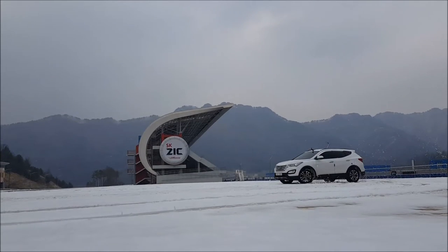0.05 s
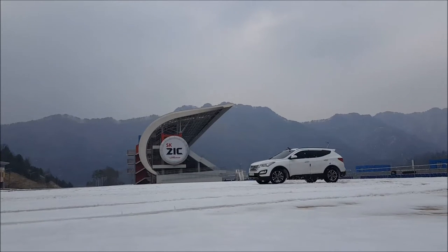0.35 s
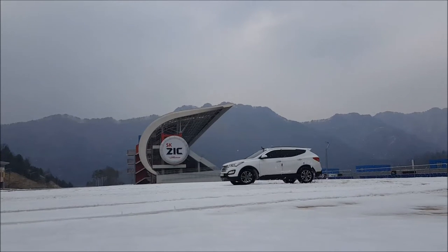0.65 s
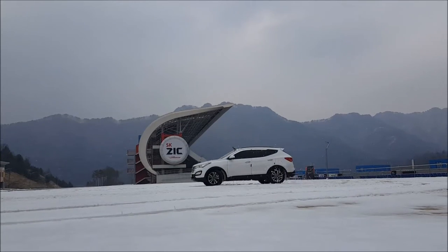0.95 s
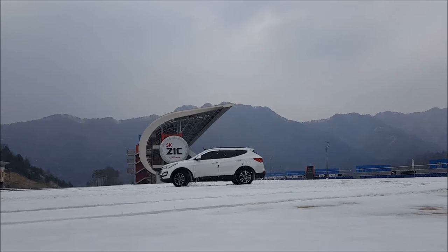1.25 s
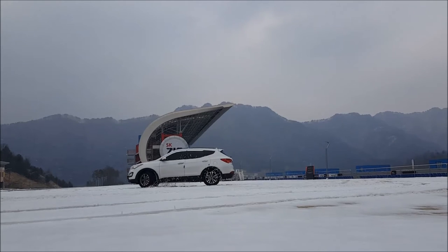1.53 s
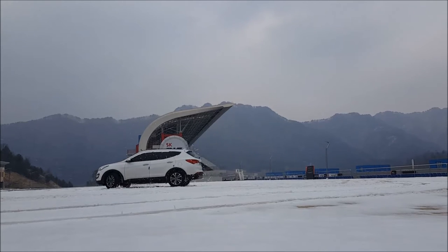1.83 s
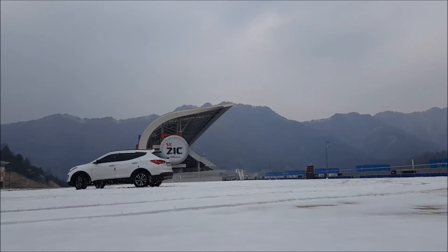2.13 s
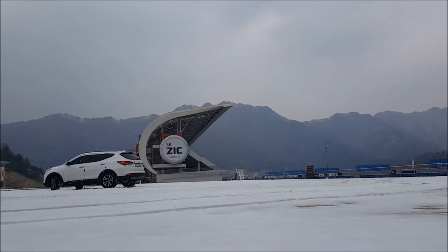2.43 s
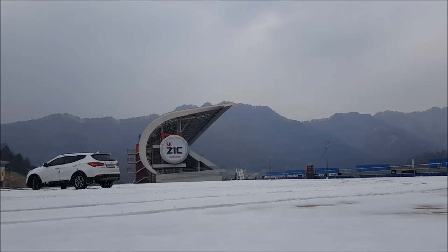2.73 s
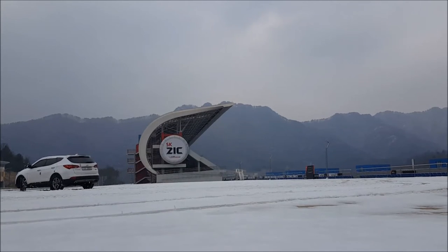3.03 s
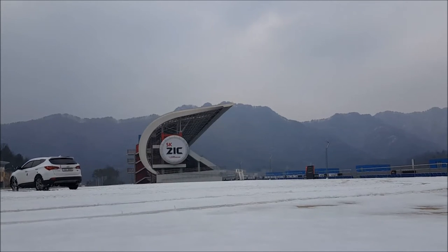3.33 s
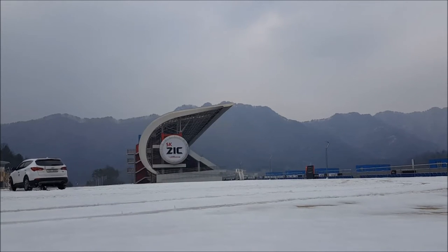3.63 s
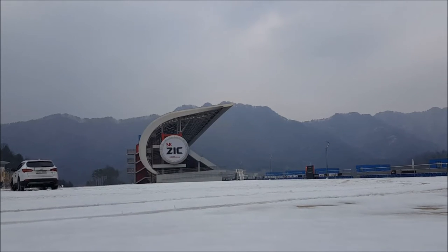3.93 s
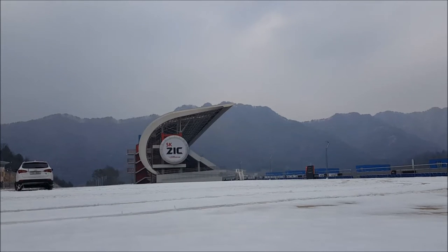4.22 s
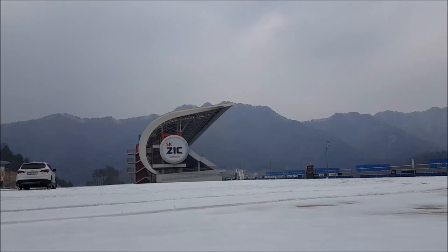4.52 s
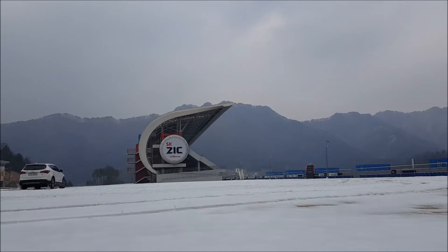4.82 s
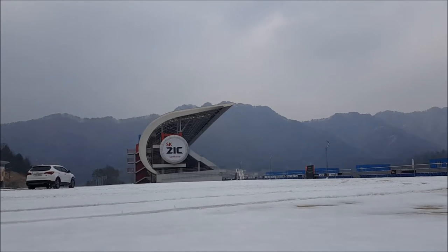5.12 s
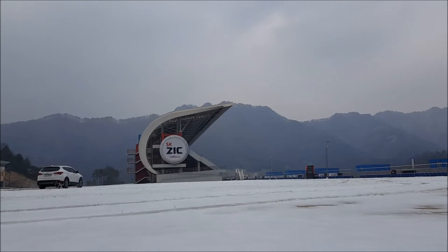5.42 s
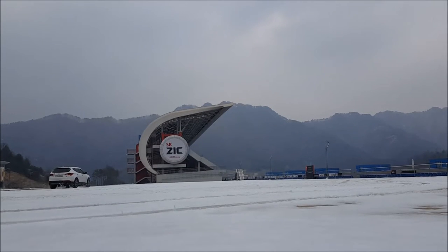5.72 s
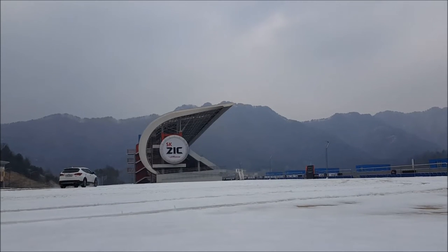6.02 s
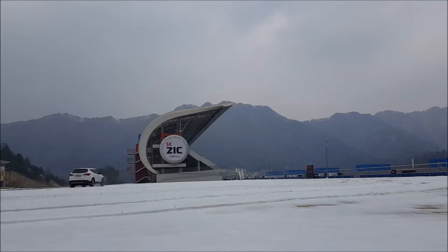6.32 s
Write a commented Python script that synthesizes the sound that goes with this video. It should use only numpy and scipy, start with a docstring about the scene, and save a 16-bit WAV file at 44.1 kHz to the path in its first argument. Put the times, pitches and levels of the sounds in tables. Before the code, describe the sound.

On an open field of packed snow, a car passes at a distance from right to left. Its tyres give a soft, steady roar with a faint wavering whine and light crunching hisses as the wheels slip. From about two seconds, gusts rumble and slap on the microphone, mostly on the left, and become the loudest sound. Near the end the wheels knock dully over ruts and the car sounds duller.

```python
"""An open field of packed snow, light air, a microphone with two closely spaced ports. Some 15 m off to
the right a car drives leftwards: its tyres roar, whine faintly and throw hissing snow, and now and then
a wheel slips, sings and scrapes. From two seconds on, with the car past centre, gusts buffet each port
separately. Around five seconds the wheels thump over ruts; then the car turns away, duller, over 30 m off."""
import sys
import numpy as np
from scipy import signal
from scipy.fft import rfft, irfft
from scipy.io import wavfile
from scipy.ndimage import uniform_filter1d, map_coordinates

SR = 44100
rng = np.random.default_rng(int(sys.argv[2]) if len(sys.argv) > 2 else 0)


def waveform_to_disk(signal):
    """Save audio, clipped to [-1, 1], as 16-bit WAV at the path in sys.argv[1]."""
    frames = np.transpose(np.atleast_2d(signal))
    scaled = np.clip(frames, -1, 1) * 32767
    samples = np.round(scaled).astype(np.int16)
    wavfile.write(sys.argv[1], SR, samples)


N = 289296
TIME, BINS = np.arange(N) / SR, np.fft.rfftfreq(N, 1 / SR)

# the car from the microphone: t/s, distance/m, lag of the left port/samples, dullness of the roar/0-1
CAR_PATH = [(0, 14.9, 5, 0.7), (.55, 19, 3, 0.5), (1.05, 14.7, 3.2, 0.44), (1.5, 21, -3.5, 0.44),
            (2.2, 17.4, -6, 0), (3.3, 23.1, -7.5, 0.42), (4, 26.8, -9, 0.53), (5.3, 28.3, -8.5, 0.38),
            (5.7, 36, -8, 0.97), (6.56, 32, -6.5, 0.93)]
# tyres rolling on packed snow: t/s, level/dB
ROAR_LEVEL = [(0, -55.5), (.58, -59), (1.08, -60), (1.45, -55.5), (1.96, -59.5), (2.2, -58), (4.7, -59),
              (6.14, -59.5), (6.56, -62)]
# their roar: f/Hz, level/dB
ROAR_SPECTRUM = [(60, -10), (150, 2), (340, -4), (450, 1), (570, 3), (650, 1), (740, 2), (850, 1.5),
                 (1000, -1.5), (1200, -6), (1450, -18.5), (2200, -31.5), (3200, -43.5)]
# a spinning wheel sings: t/s, length/s, f/Hz, glide from start to end/Hz, arch/Hz, level/dB
WHEEL_SPINS = [(0, 0.56, 852, -44, 5.5, -63), (0, .45, 897, -68, 3.5, -70),
               (0.622, 0.45, 731, -12, -3, -66.5), (1.2, 0.548, 806, 27.5, 26, -63),
               (2.25, 0.78, 822, -17, -1.5, -68), (3.15, 0.56, 801, -43.5, -4, -63),
               (3.55, 0.24, 722, 39, -7, -65), (3.72, 0.29, 837, 32, 3, -61.5),
               (4.08, 0.44, 791, -37.5, 12.5, -64), (4.47, 0.37, 805, 28, 5.5, -60.5),
               (4.589, 0.295, 746, 14.5, 3.5, -63.5), (4.721, 0.61, 720, 53.5, 5, -62),
               (4.85, 1, 802, 50, 14.5, -63.5), (5.52, 0.94, 758.5, 18, 41, -63)]
# its tone and the side notes of uneven tread blocks: multiple of the pitch, level/dB
TREAD_NOTES = [(.908, -7), (1, 0.5), (1.045, -7)]
# wheels slip and grip: t/s, length/s, tread pattern f/Hz, glide/Hz, arch/Hz, level/dB
WHEEL_SLIPS = [(-.3, .72, 57.02, -10, 3, -53.5), (1.122, 1.01, 50.04, -1.5, 8, -57.5),
               (3.001, 1.487, 55, 1, 0.5, -61)]
# resonances of the tyre body: f/Hz, level/dB
CARCASS_SPECTRUM = [(380, 15.5), (450, -3.5), (505, -17), (565, 8), (640, -28), (735, -8.5), (850, -12),
                    (1050, -10)]
# a wheel digs in, heard at NEAR_M: peak t/s, half width/s, crunch level/dB, scrape f/Hz, spray level/dB
SNOW_SKIDS = [(.05, 0.14, -80, 4200, -75.5), (.32, 0.082, -74, 3890, -77), (.62, 0.17, -72, 3720, -81),
              (1.23, .04, -79.5, 3700, -79), (1.46, 0.12, -70.5, 3580, -74), (1.74, .16, -69, 2924, -67.5),
              (1.96, 0.062, -75, 2810, -84), (2.19, .04, -82, 3730, -75), (2.39, .09, -78, 4260, -69.5),
              (2.82, .12, -74.5, 2800, -74), (3.92, 0.14, -71.5, 3920, -74), (4.2, 0.08, -73.5, 3600, -77),
              (4.92, .2, -73.5, 4000, -83), (5.4, 0.21, -76.5, 4050, -79)]
# crust breaking: f/Hz, level/dB
CRUNCH_SPECTRUM = [(1400, -24), (2300, -4.5), (3100, -0.5), (4100, 0), (5200, -2.5), (7000, -2), (8500, -3),
                   (10000, -15), (12000, -19.5), (16000, -33)]
# flung powder: f/Hz, level/dB
SPRAY_SPECTRUM = [(5000, -28.5), (7500, -11.5), (9000, -1.5), (10200, -5.5), (11800, -1), (15500, 0)]
# wheels striking ruts: t/s, level/dB, centre f/Hz, decay/s
RUT_THUMPS = [(4.67, -49, 766, 0.036), (5.279, -40.5, 850, 0.0095), (5.3, -58.5, 953, 0.094)]
# steady wind at the microphone: t/s, level/dB, left minus right/dB, depth of rumble (clipped to 0-1)
STEADY_WIND = [(0, -43.5, -4.5, -2), (1.15, -46.5, -1, 0.1), (1.8, -48.5, -1, 0.27), (2.02, -57.5, 1, 0.7),
               (2.1, -38, 10.5, 0.73), (2.95, -44.5, -0.5, 1), (3.3, -39, -3, 0.71), (4.3, -37, 3, 0.89),
               (5.2, -42, 5, 0.58), (6.56, -40.5, 3, 0.89)]
# gusts that swell and die away: peak t/s, half width/s, left level/dB, right level/dB
PORT_GUSTS = [(0.089, 0.042, -40, -47.5), (0.759, 0.017, -37.5, -34.5), (1.01, 0.054, -48.5, -44.5),
              (2.13, 0.052, -33, -35), (2.35, 0.15, -31, -39), (2.61, 0.02, -31.5, -45.5),
              (2.79, 0.016, -42.5, -36.5), (3.21, 0.11, -24.5, -45.5), (3.48, 0.091, -24.5, -34),
              (3.612, 0.052, -31.5, -32), (3.74, 0.014, -28.5, -42), (3.868, 0.025, -22.5, -41.5),
              (3.972, 0.018, -23, -51), (4.07, 0.023, -26, -42), (4.431, 0.059, -30.5, -40),
              (4.64, 0.075, -31.5, -31.5), (4.97, 0.039, -31.5, -20.5), (5.09, 0.043, -22, -35.5),
              (5.3, 0.025, -26, -41.5), (5.46, 0.18, -24.5, -38.5), (5.56, 0.037, -28.5, -21.5),
              (5.79, 0.065, -28, -23), (5.921, 0.018, -19.5, -35.5), (6.06, 0.086, -32.5, -30.5),
              (6.36, 0.018, -29.5, -30)]
# large eddies in light air: f/Hz, level/dB
BREEZE_SPECTRUM = [(20, -34), (35, -27.5), (55, -6.5), (100, 3.5), (150, 2.5), (220, -1), (300, -11.5),
                   (400, -19.5)]
# large eddies in strong wind: f/Hz, level/dB
GALE_SPECTRUM = [(15, -31.5), (35, -4.5), (65, 5), (120, 4), (200, -4), (300, -30), (450, -45)]
# small eddies: f/Hz, level/dB
FLUTTER_SPECTRUM = [(120, 4), (230, 6), (360, -2), (550, -16), (800, -22.5), (1300, -40), (2500, -60),
                    (6000, -70.5)]
# single eddies that slap a port: t/s, level/dB, left minus right/dB, length/s
EDDY_SLAPS = [(2.242, -22, 26, 0.0015), (2.314, -15.5, 29, 0.0013), (2.447, -23, 20, 0.0016),
              (2.565, -25.5, 23, 0.0018), (3.14, -18, 29, 0.0016), (3.446, -15.5, 33, 0.00096),
              (3.617, -15, 35, 0.0013), (3.888, -18.5, 29, 0.001), (3.974, -17, 38, 0.0011),
              (4.065, -22, 28, 0.0011), (4.581, -21, 25, 0.0011), (4.947, -23, -3.5, 0.0015),
              (4.975, -17.5, -24, 0.0011), (5.089, -15.5, 28, 0.0014), (5.577, -22, 5, 0.0016),
              (5.861, -19.5, -22.5, 0.0014), (5.920, -16.5, 39.5, 0.0014)]
# small sharp ticks: t/s, level/dB, centre f/Hz, decay/s
SHARP_TICKS = [(.419, -57.5, 2270, 0.0023), (1.235, -69, 11020, 0.0095), (2.754, -63, 14000, 0.0076),
               (3.017, -61, 3500, 0.0023), (3.2, -63, 3070, 0.0015), (4.2235, -61, 3280, 0.0026),
               (4.553, -63, 2115, 0.0049), (4.7237, -50.5, 15100, 0.0012), (6.041, -65, 2600, 0.0024),
               (6.064, -65, 4540, .002), (6.257, -64, 2600, .003), (6.468, -64, 2200, .002)]
# open air over the field: f/Hz, level/dB
AIR_SPECTRUM = [(30, -4), (150, 5), (600, -2), (1100, -11.5), (1600, -22.5), (2500, -27.5), (4500, -34),
                (10000, -37), (16000, -31)]
# wind over the ground: f/Hz, level/dB
RUSTLE_SPECTRUM = [(900, -1), (1500, -1.5), (2100, -3), (2800, -10), (4500, -15), (8000, -26.5)]

NEAR_M, SNOW_FALL_DB = 18.74, 9.5  # the snow loses this much with each doubling of distance from NEAR_M
PORT_HZ, PORT_WIDTH_HZ, PORT_DB = 8080, 600, 5  # cavity resonance of the microphone ports
BAND_LIMIT_HZ = 15800


def tyre_roar(level_db=2.0, uneven_db=1.44, muffle_hz=980):
    """The tread rolls on uneven packed snow; the roar dulls and brightens along the car's path."""
    (roar_db,), (_, _, dullness) = follow(ROAR_LEVEL), follow(CAR_PATH)
    roar = from_car(colour(noise()[0], ROAR_SPECTRUM), colour(noise(), ROAR_SPECTRUM), direct=1)
    muffled = irfft(rfft(roar) / (1 + (BINS / muffle_hz) ** 12), N)
    roar += dullness * (muffled - roar)
    return roar * amp(level_db + roar_db + uneven_db * wander(25)[0])


def wheel_whine(level_db=2.0, waver=0.0021, flicker_db=1.0):
    """Each spinning wheel gives a tone with side notes, whose pitch follows the wheel's speed."""
    out, unsteady = np.zeros(N), 1 + waver * wander(14)[0]
    for row in WHEEL_SPINS:
        during, hz, gain = slip(*row)
        turns = np.cumsum(hz * unsteady[during]) / SR
        tone = sum(amp(db) * np.cos(2 * np.pi * (k * turns + rng.random())) for k, db in TREAD_NOTES)
        out[during] += gain * evened(tone)
    return from_car(out * amp(level_db + flicker_db * wander(12)[0]))


def tread_whirr(level_db=-1.5, uneven_db=5.0, waver=.013):
    """Overtones of the tread pattern slide through the resonances of the tyres as the wheels slip."""
    tread_hz, gain = np.zeros((2, N))
    for row in WHEEL_SLIPS:
        during, tread_hz[during], gain[during] = slip(*row)
    turns = np.cumsum(tread_hz * (1 + waver * wander(25)[0])) / SR
    overtones = sum(amp(uneven_db * wander(4.4)[0]) * np.cos(2 * np.pi * (k * turns + rng.random()))
                    for k in range(8, 20))
    slipping = gain > 0
    whirr = colour(overtones * slipping, CARCASS_SPECTRUM) * np.sqrt(slipping.mean())  # rms 1 in slips
    return amp(level_db) * gain * from_car(whirr)


def slip(start, length, hz, glide_hz, arch_hz, db, fullness=0.61):
    """A wheel loses grip and finds it again: the samples it lasts, their arching pitch and their gain."""
    progress = (TIME - start) / length
    during = (progress > 0) & (progress < 1)
    progress = progress[during]
    arch = 4 * progress * (1 - progress)
    return during, hz + glide_hz * (progress - .5) + arch_hz * arch, amp(db) * arch ** fullness


def thrown_snow(scrape_db=-5, rolling_crunch_db=-75, rolling_spray_db=-76, direct=0.38, clumps_db=0.77):
    """The tread crushes crust and flings powder; skids add to both and scrape; distance weakens all."""
    crunch_power, spray_power, weighted_hz = np.zeros((3, N))
    for t, width, crunch_db, hz, spray_db in SNOW_SKIDS:
        bell = swell(t, width)
        crunch_power += amp(crunch_db) ** 2 * bell
        spray_power += amp(spray_db) ** 2 * bell
        weighted_hz += amp(crunch_db) ** 2 * bell * hz
    # where skids overlap, the scrape slides from one pitch to the next
    out = from_car(scrape(weighted_hz / crunch_power)) * np.sqrt(crunch_power) * amp(scrape_db)
    for spectrum, skid_power, rolling_db in ((CRUNCH_SPECTRUM, crunch_power, rolling_crunch_db),
                                             (SPRAY_SPECTRUM, spray_power, rolling_spray_db)):
        crystals = colour(grains(per_s=9000, spread_db=3.0)[0], spectrum)
        gain = np.sqrt(skid_power + amp(rolling_db) ** 2) * amp(clumps_db * wander(30)[0])
        out += from_car(crystals, colour(noise(), spectrum), direct) * gain
    distance_m = follow(CAR_PATH)[0]
    return out * amp(-SNOW_FALL_DB * np.log2(distance_m / NEAR_M))


def scrape(hz, width_hz=520):
    """Snow squeezed under a sliding tread: a fuzzy band of noise that follows hz."""
    band = irfft(rfft(noise()) * np.exp(-(BINS / width_hz) ** 2), N)
    phase = 2 * np.pi * np.cumsum(hz) / SR
    return evened(band[0] * np.cos(phase) + band[1] * np.sin(phase))


def rut_thumps():
    """The wheels knock dully over ruts."""
    return from_car(bursts(RUT_THUMPS, octaves=.42)[0])


def from_car(source, scatter=0, direct=1):
    """The direct share of the power reaches one port first; the scattered rest comes from all around."""
    _, lag, _ = follow(CAR_PATH)
    ports = np.array([map_coordinates(source, [np.arange(N) + side * lag / 2], order=3, mode="nearest")
                      for side in (-1, 1)])
    return np.sqrt(direct) * ports + np.sqrt(1 - direct) * scatter


def port_wind(rumble_db=-1, flutter_db=-14, strong_db=-35, lumpy_db=3.0, steadiness=0.77):
    """Large eddies rumble, deeper once the wind gets up; stronger gusts shed more small fluttering ones."""
    port_db = wind_level()
    depth = np.clip(follow(STEADY_WIND)[2], 0, 1)
    eddies = np.sqrt(1 - depth) * colour(noise(), BREEZE_SPECTRUM)
    eddies += np.sqrt(depth) * colour(noise(), GALE_SPECTRUM)
    # partly levelled over 50 ms, so that the gust sets the power of the eddies
    eddy_power = uniform_filter1d(eddies ** 2 + 1e-6, size=2200)
    eddies = evened(eddies / eddy_power ** (steadiness / 2))
    lumps = wander(56)
    rumble = evened(eddies * amp(lumpy_db * lumps))
    # small eddies come in ragged bunches, on the crests of the large ones
    flutter = evened(colour(noise(), FLUTTER_SPECTRUM) * amp(10 * np.tanh(lumps / 2)))
    growth_db = 2 * np.tanh((port_db - strong_db) / 10)
    return amp(port_db) * (amp(rumble_db) * rumble + amp(flutter_db + growth_db) * flutter)


def wind_level(restless_db=3.5, restless_hz=7):
    """Level in dB at each port: gusts ride on a restless steady wind."""
    steady_db, lean_db, _ = follow(STEADY_WIND)
    power = (amp(steady_db + restless_db * wander(restless_hz)) * panned(lean_db)) ** 2
    for t, width, left_db, right_db in PORT_GUSTS:
        power += amp([[left_db], [right_db]]) ** 2 * swell(t, width)
    return 10 * np.log10(power)


def eddy_slaps(level_db=-3, edge=0.55):
    """An eddy crossing a port: pressure builds, flips quickly to suction and relaxes."""
    out = np.zeros((2, N))
    for t, db, lean_db, length in EDDY_SLAPS:
        crossing = (TIME - t) / length
        slap = -np.tanh(crossing / edge) * np.exp(-np.hypot(crossing, edge))
        out += panned(lean_db)[:, None] * amp(db) * slap / abs(slap).max()
    return amp(level_db) * out


def ticks(level_db=-1):
    """Brief bright snaps, faint at both ports."""
    return amp(level_db) * bursts(SHARP_TICKS, octaves=1.27)


def open_field(air_db=-64, rustle_db=-74, patchy_db=1.77, breeze_db=-41, growth=0.3):
    """Faint even wash of the open air, and a rustle over the ground that grows with the steady wind."""
    sweep_db = growth * (follow(STEADY_WIND)[0] - breeze_db)
    rustle = colour(grains(per_s=5000, spread_db=1.5), RUSTLE_SPECTRUM)
    rustle *= amp(rustle_db + sweep_db + patchy_db * wander(25))
    return amp(air_db) * colour(noise(), AIR_SPECTRUM) + rustle


def grains(per_s, spread_db):
    """Breaking snow crystals: many tiny clicks, a few of them larger."""
    size = amp(spread_db * np.minimum(rng.exponential(1, (2, N)), 5))
    return evened(noise() * size * (rng.random((2, N)) < per_s / SR))


def bursts(rows, octaves):
    """Each blow is a puff of noise that dies away, ringing in one band."""
    out, size = np.zeros((2, N)), 16384
    age, bins = TIME[:size] - TIME[size // 20], np.fft.rfftfreq(size, 1 / SR)
    for t, db, hz, decay in rows:
        puff = rng.standard_normal((2, size)) * (age > 0) * np.exp(-abs(age) / decay)
        band = evened(np.exp(-(np.log2((bins + 1) / hz) / octaves) ** 2))
        start = round((t + age[0]) * SR)
        part = out[:, start:start + size]
        part += amp(db) * irfft(rfft(puff) * band)[:, :part.shape[1]]
    return out


def swell(t, width):
    """Power of a bell that peaks at t and dies away on both sides."""
    return np.exp(-np.minimum(((TIME - t) / width) ** 2, 20))


def colour(x, spectrum):
    """Gives x a spectrum that falls 39 dB an octave beyond its ends; rms 1."""
    hz, db = np.transpose(spectrum)
    octave, known = np.log2(BINS + 1), np.log2(hz + 1)
    beyond = abs(octave - np.clip(octave, known[0], known[-1]))
    return evened(irfft(rfft(x) * amp(np.interp(octave, known, db) - 39 * beyond), N))


def wander(hz):
    """Two slow random curves of rms 1, moving at rates up to about hz."""
    spectrum = rng.standard_normal((2, 1024, 2)) @ [1, 1j]
    return evened(irfft(spectrum * np.exp(-(BINS[:1024] / hz) ** 2), N))


def noise():
    """Unrelated white noise for the two ports."""
    return rng.standard_normal((2, N))


def follow(rows):
    """The columns of a curve table at every sample."""
    t, *columns = np.transpose(rows)
    return [np.interp(TIME, t, column) for column in columns]


def panned(lean_db):
    """Left and right gains of constant power."""
    pair = np.array([amp(lean_db / 2), amp(-lean_db / 2)])
    return pair / np.sqrt(np.mean(pair ** 2, 0))


def amp(db):
    """Decibels to gain."""
    return 10 ** (np.asarray(db) / 20)


def evened(x):
    """Scales to rms 1."""
    return x / np.sqrt(np.mean(x ** 2) + 1e-20)


def scene():
    """The distant car, the field all around and the wind right on the microphone."""
    car = tyre_roar() + wheel_whine() + tread_whirr() + thrown_snow() + rut_thumps()
    return car + ticks() + open_field() + port_wind() + eddy_slaps()


def record(dry):
    """The microphone: its port cavities ring in the treble, and a steep low-pass ends the band."""
    cavity = amp(PORT_DB * np.exp(-((BINS - PORT_HZ) / PORT_WIDTH_HZ) ** 2))
    soft_ends = signal.windows.tukey(N, .002)
    heard = irfft(rfft(dry * soft_ends) * cavity, N)
    low_pass = signal.firwin(511, BAND_LIMIT_HZ, window=("kaiser", 9), fs=SR)
    return signal.oaconvolve(heard, low_pass[None], "same")


dry = scene()
out = record(dry)
waveform_to_disk(out)
```